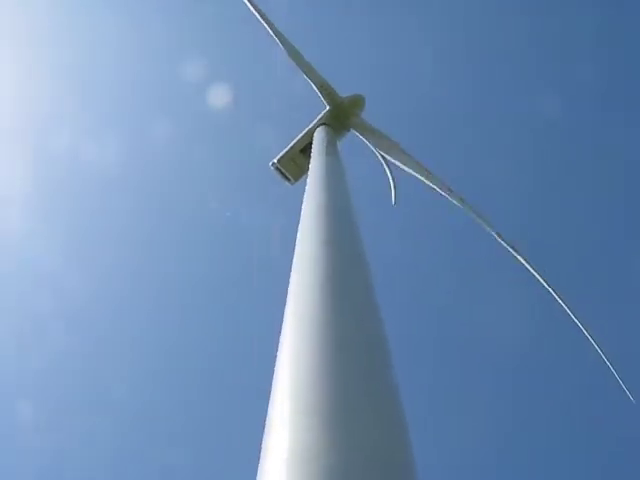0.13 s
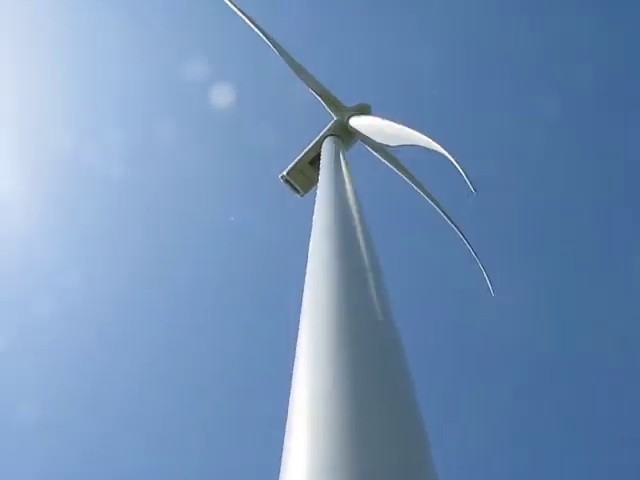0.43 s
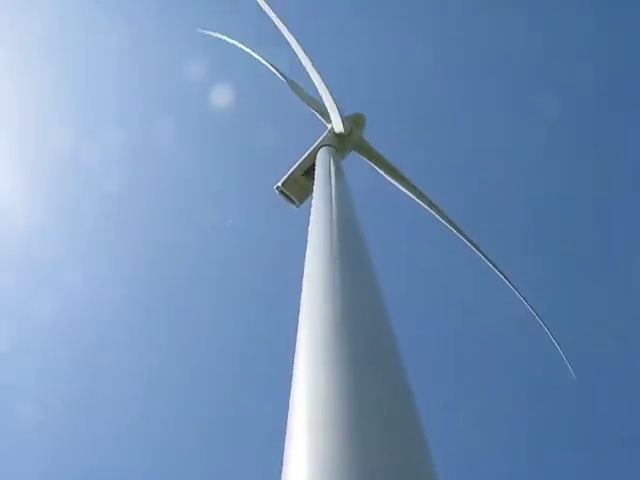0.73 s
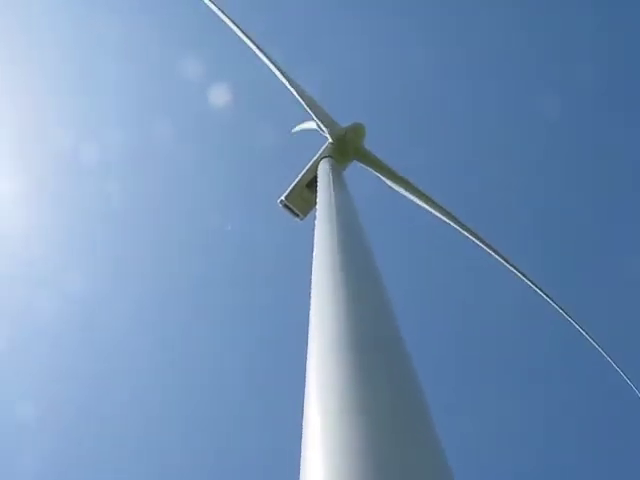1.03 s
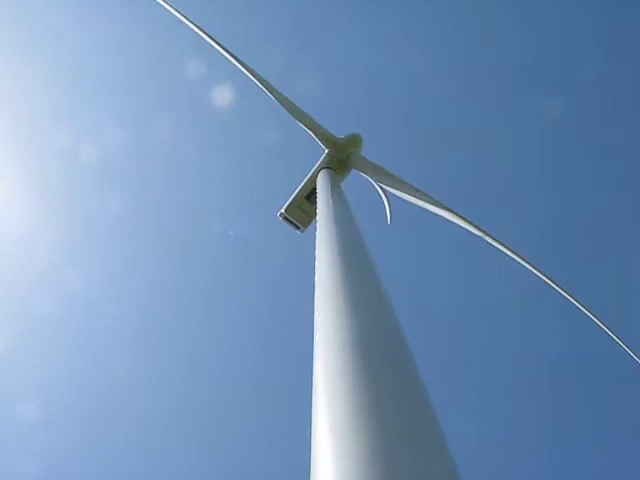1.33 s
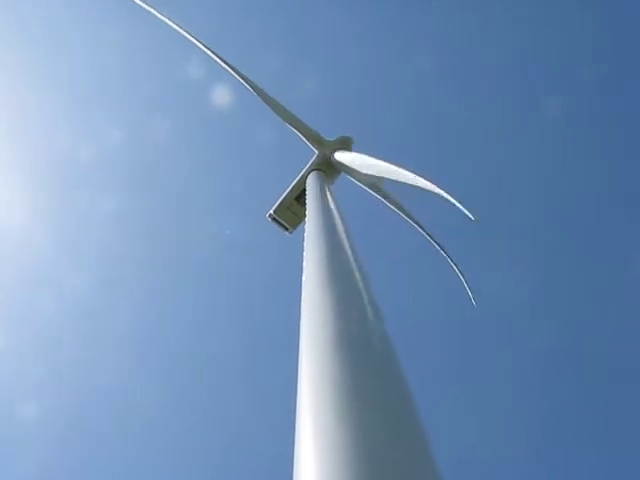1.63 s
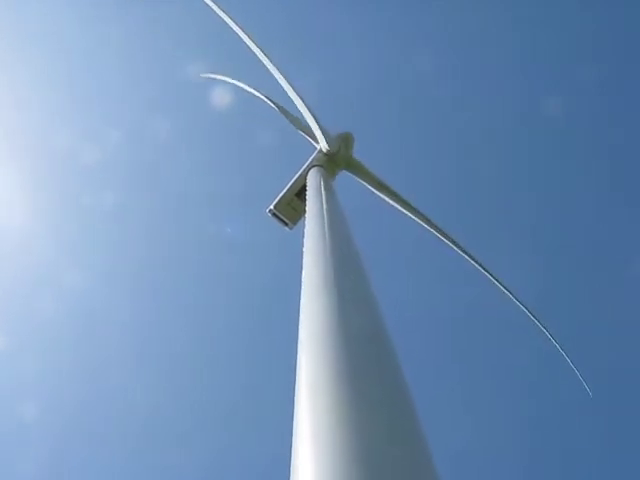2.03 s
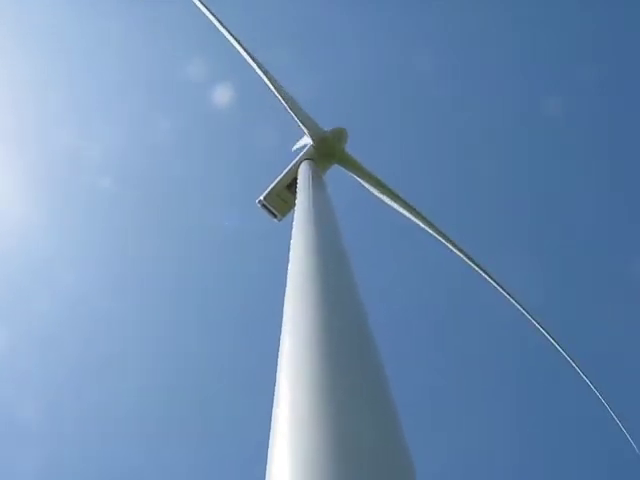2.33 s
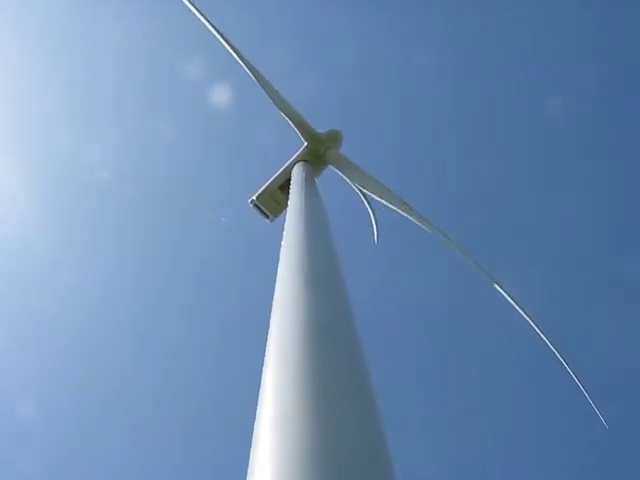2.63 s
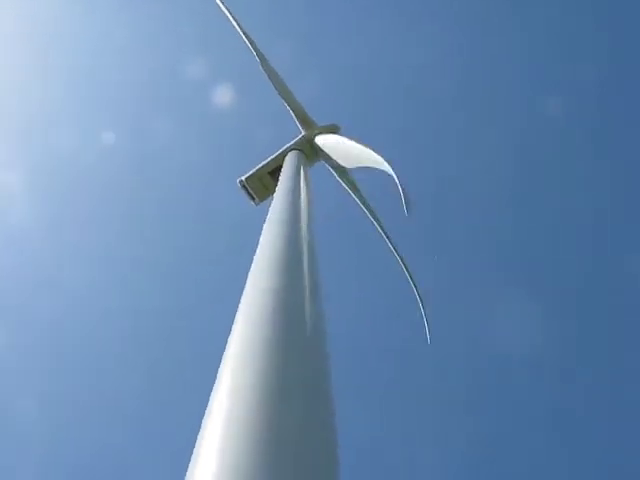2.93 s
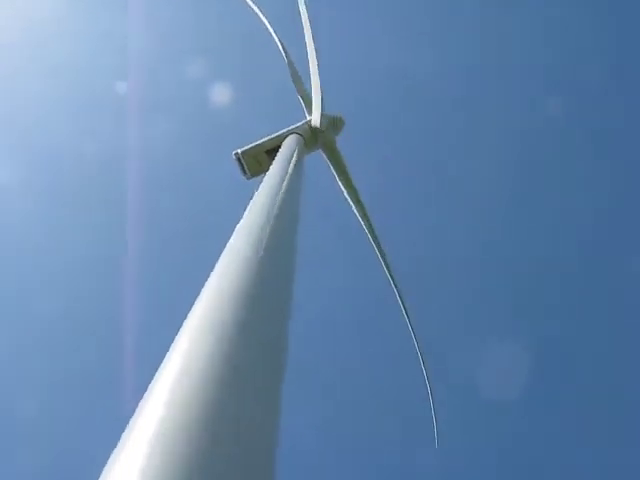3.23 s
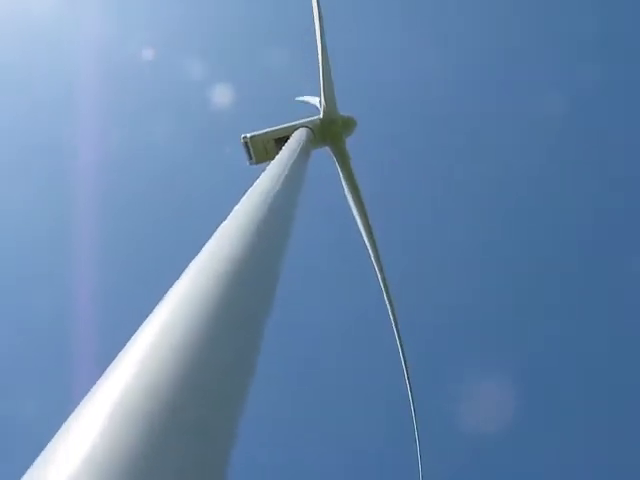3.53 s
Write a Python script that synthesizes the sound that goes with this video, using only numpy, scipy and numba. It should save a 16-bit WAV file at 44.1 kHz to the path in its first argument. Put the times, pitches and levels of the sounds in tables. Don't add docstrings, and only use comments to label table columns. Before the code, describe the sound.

Wind buffeting dominates, low and fluttering, heavier in the right channel; behind it, soft airy blade swooshes swell and fade regularly from a tall wind turbine, heard from its foot in an open outdoor place.

```python
import sys
import numpy as np
from scipy import signal
from scipy.io import wavfile
from scipy.ndimage import uniform_filter1d, map_coordinates
from numba import njit

SR = 44100
rng = np.random.default_rng(int(sys.argv[2]) if len(sys.argv) > 2 else 0)


def gain_from_decibels(decibels):
    exponent = np.asarray(decibels, float) / 20
    return 10 ** exponent


def generate_wav(signal):
    frames = np.transpose(np.atleast_2d(signal))
    scaled = np.clip(frames, -1, 1) * 32767
    pcm = np.round(scaled).astype(np.int16)
    wavfile.write(sys.argv[1], SR, pcm)


N = 162729


@njit
def swept_bandpass(x, hz_share, damping):
    y, band_state, low_state = np.empty(len(x)), 0., 0.
    for i in range(len(x)):
        g = np.tan(np.pi * hz_share[i])
        v = (band_state + g * (x[i] - low_state)) / (1 + g * (g + damping))
        band_state = 2 * v - band_state
        low_state = low_state + 2 * g * v
        y[i] = damping * v
    return y


def noise_band(hz, damping):
    centre = np.clip(hz * np.ones(N) / SR, 0, 4 / 9)
    once = swept_bandpass(rng.standard_normal(N), centre, damping)
    return swept_bandpass(once, centre, damping)


def at(spectrum, hz):
    table = np.array(spectrum)
    return np.interp(np.log(hz), np.log(table[:, 0]), table[:, 1])


def unit(x):
    return x / np.sqrt(np.mean(x ** 2))


def walk(rate_hz):
    lowpass = signal.butter(2, rate_hz, fs=SR, output="sos")
    return unit(signal.sosfilt(lowpass, rng.standard_normal(N)))


def pulse(turns, cycles):
    return np.exp(-(turns / np.where(turns < 0, cycles, 2 * cycles)) ** 2)


# time in seconds, strength in dB, crest in dB,
# second swell in dB, fade time in seconds.
PASSES = [
    (-.58, 12, -3, -8, 0.28),
    (.64, 5.5, -2, -16, 0.31),
    (1.865, 4.5, 0, -19, 0.39),
    (3.07, 7.5, -3, -10, 0.44),
    (4.29, 15.5, -3, -8, .4),
]


def passes(t):
    power, place = gain_from_decibels(2 * FAR_DB), 0
    approach_s, cusp_s = 0.3, 0.025
    for s, db, crest_db, after_db, fade_s in PASSES:
        d = t - s
        body = np.exp(-2 * np.abs(d) / np.where(d < 0, approach_s, fade_s))
        body += gain_from_decibels(2 * crest_db) * np.exp(-(d / cusp_s) ** 2)
        body += gain_from_decibels(2 * -9.5) * np.exp(-((d + 0.16) / 0.058) ** 2)
        body += gain_from_decibels(2 * after_db) * np.exp(-((d - 0.22) / 0.041) ** 2)
        p = gain_from_decibels(2 * db) * body
        power = power + p
        place = place + p * np.tanh(d / 0.35)
    return 10 * np.log10(power), place / power


FAR_DB = -41
# frequency in Hz, level in dB per Hz.
SWISH = [(300, 7), (1000, -3), (2200, -3.5), (3300, -2.5), (4200, -1.5), (7000, -10.5), (10000, -20.5),
         (15500, -26.5)]
# frequency in Hz, share of the swell in dB per dB.
DEPTH = [(500, 0.53), (2000, 0.16), (4500, 1.05), (8000, 1.4), (15000, 1.7)]


def blades(t):
    swell_db, bearing = passes(t)
    alike_near, alike_far = 0.9, 0.47
    alike = np.clip(alike_near + (alike_far - alike_near) * swell_db / FAR_DB, 0, 1)
    hiss, eddy = 0, walk(50)
    for hz in 300 * 2 ** (np.arange(18) / 3):
        db = at(SWISH, hz) + at(DEPTH, hz) * (swell_db + 0.67 * eddy) + 0.88 * walk(4.5)
        hiss = hiss + gain_from_decibels(db) * np.array([noise_band(hz, 0.73) for _ in range(3)])
    hiss = unit(hiss) * gain_from_decibels(-41)
    shared, apart = hiss[0], hiss[1:]
    lag = 0.7 - 1.9 * bearing
    late = map_coordinates(shared, [np.arange(N) - lag], order=5, mode="mirror")
    treble = signal.lfilter(*signal.butter(2, 9100, "high", fs=SR), apart)
    return np.sqrt(alike) * np.array([late, shared]) + np.sqrt(1 - alike) * apart + 0.096 * treble


def recorder_hiss():
    return gain_from_decibels(-90) * np.array([unit(noise_band(11500, 1.6)) for _ in range(2)])


def port(colour, level_db, octaves, flicker_db):
    out = 0
    for hz in 28 * 2 ** (np.arange(16) / 2):
        db = at(colour, hz) + flicker_db * walk(16.3)
        out = out + gain_from_decibels(db) * noise_band(hz * 2 ** octaves, 0.55)
    return unit(out) * gain_from_decibels(level_db)


# time in seconds, level in dB, left minus right in dB, air speed in octaves, of which only the
GUST = [(0.0, -22, -7.5, 0.16), (0.14, -22.5, -8, 0.43), (0.25, -19, -12, 0.29), (0.46, -23, -7, 0.4),
        (0.76, -19, -12, 0.44), (0.97, -22, -10, 0.38), (1.04, -19.5, -10.5, 0.41),
        (1.73, -24.5, -13.5, 0.37), (2.21, -21.5, -12, 0.3), (2.28, -23.5, -14, 0.2),
        (2.48, -25, -11, 0.17), (2.75, -24, -10, 0.35), (2.84, -21.5, -14, 0.28), (2.95, -24, -8.5, 0.34),
        (3.13, -21, -8, 0.24), (3.52, -22.5, -5, 0.32), (3.63, -18.5, -9, 0.1), (3.69, -24.5, -4, 0.36)]
# frequency in Hz, level in dB per Hz.
RIGHT = [(25, -44), (60, -13), (150, 0), (300, 1), (500, -2), (900, -16), (1800, -29), (4000, -55)]
# frequency in Hz, level in dB per Hz.
LEFT = [(25, -27), (60, -14), (130, -8.5), (200, -7.5), (400, -23.5), (800, -30), (1600, -44), (3000, -61)]


def wind(t):
    when, db, lean_db, speed = np.array(GUST).T
    gust = np.interp(t, when, db)
    lean = np.interp(t, when, lean_db)
    swell = np.interp(t, when, speed)
    surge_db = surges(t)
    flutter = 0.04 * walk(18.6) + 0.085 * walk(47.0) + 0.14 * walk(214)
    octaves = swell - swell.mean() + puff_speed(t) + 0.0427 * surge_db + flutter
    right = port(RIGHT, 6.5 + gust + 0.44 * surge_db + 0.4 * walk(17.0), octaves, 0.39)
    left_octaves = 0.088 * walk(14.3) + 0.17 * walk(91)
    left = port(LEFT, 6 + gust + lean + 0.5 * walk(7.2), left_octaves, 1.75)
    return np.array([left, right])


SURGE_RISE_S = 0.00287
# time in seconds, peak in dB, pitch in Hz.
BUFFETS = [(0.16, -16, 643), (0.306, -22, 397), (0.368, -18.5, 420), (0.405, -12.5, 516),
           (0.681, -18.5, 600), (0.856, -19.5, 439), (0.932, -19, 534), (1.052, -14, 610),
           (1.162, -18.5, 401), (1.212, -18.5, 506), (1.289, -13, 403), (1.349, -17.5, 570),
           (1.403, -17.5, 396), (1.592, -21, 519), (1.794, -10.5, 460), (1.929, -16, 563),
           (2.166, -14, 635), (2.258, -15, 589), (2.37, -13, 513), (2.401, -15.5, 437), (2.774, -16.5, 396),
           (2.938, -20.5, 428), (2.997, -21.5, 606), (3.111, -12, 574), (3.191, -18, 530), (3.25, -17, 444),
           (3.341, -20, 436), (3.486, -16, 406), (3.552, -14.5, 554), (3.673, -15, 490)]


def thuds(t):
    out, cycles = np.zeros(N), 0.95
    for s, db, hz in BUFFETS:
        turns = (t - s - SURGE_RISE_S) * hz - cycles
        out += gain_from_decibels(db + 2) * pulse(turns, cycles) * np.sin(2 * np.pi * turns)
    return out


def surges(t):
    surge_db, fade_s = np.zeros(N), 0.027
    for s, db, _ in BUFFETS:
        d = t - s - SURGE_RISE_S
        surge_db += max(db + 20, 0) * np.exp(-np.abs(d) / np.where(d < 0, SURGE_RISE_S, fade_s))
    return surge_db - surge_db.mean()


# time in seconds, peak in dB, pitch in Hz.
LUMPS = [(0.214, -16, 208), (0.314, -18, 187), (0.726, -14, 283), (1.049, -10, 194), (1.404, -12, 369),
         (1.817, -12, 234), (2.12, -13, 186), (2.255, -12, 238), (2.296, -9, 280), (2.839, -10.5, 287),
         (3.098, -13, 180), (3.177, -14, 310), (3.305, -12, 318), (3.546, -8.5, 186), (3.6, -11, 139)]


def lumps(t):
    out, cycles = np.zeros(N), 1.23
    for s, db, hz in LUMPS:
        turns = (t - s) * hz - cycles
        out += gain_from_decibels(db + 3) * np.exp(-(turns / cycles) ** 2) * np.sin(2 * np.pi * turns)
    return out


# time in seconds, peak in dB, pitch in Hz.
PUFFS = [(0.2754, -33, 3140), (0.3714, -28.5, 3120), (0.408, -29, 2600), (0.703, -17, 2580),
         (0.8958, -23, 2170), (0.995, -23, 2200), (1.0347, -23, 2800), (1.104, -24, 3300),
         (1.1303, -30, 3800), (1.295, -30, 3000), (1.332, -26, 3200), (1.423, -32, 3676),
         (1.4443, -42, 2600), (1.471, -34.5, 2600), (1.509, -29.5, 2600), (1.5535, -17, 2170),
         (1.594, -27, 1900), (1.7316, -24, 2300), (1.768, -21.5, 2800), (1.799, -23.5, 2000),
         (1.9657, -19, 1500), (2.0876, -37, 3700), (2.182, -31, 2000), (2.1934, -26.5, 2100),
         (2.2494, -47, 3676), (2.27, -27.6, 2600), (2.275, -42, 2186), (2.2924, -17, 1600),
         (2.3082, -16, 2280), (2.334, -30, 2200), (2.4, -32, 2600), (2.7623, -24, 2186),
         (2.78, -16.5, 1890), (3.123, -18, 1410), (3.1264, -6.5, 3080), (3.1439, -19, 1545),
         (3.599, -16, 1838), (3.6227, -18.5, 1838)]


def ticks(t):
    out, sag = np.zeros(N), 0.4
    for s, db, hz in PUFFS:
        near = slice(int((s - .01) * SR), int((s + .02) * SR))
        turns = (t[near] - s) * hz
        falling = turns * (1 - sag * np.tanh(turns / 4))
        out[near] += gain_from_decibels(db - 1.5) * pulse(turns, 1.6) * np.sin(2 * np.pi * falling)
    return out


def puff_speed(t):
    octaves = np.zeros(N)
    for s, db, _ in PUFFS:
        octaves += 0.02 * max(db + 32.5, 0) * np.exp(-np.abs(t - s) / .005)
    return np.minimum(octaves, .4)


def rasp(t):
    swell = np.zeros(N)
    for s, db, _ in PUFFS:
        swell += gain_from_decibels(min(db, -27)) * np.exp(-np.abs(t - s) / 0.025)
    grain = unit(noise_band(2200 * 2 ** (.12 * walk(27)), 0.72))
    return gain_from_decibels(-14.5 + 2.7 * walk(150)) * swell * grain


# time in seconds, left level in dB, right level in dB.
SKIPS = [
    (1.4234, -24, -20),
    (2.8798, -34, -27),
]


def skips(t):
    out = np.zeros((2, N))
    for s, left_db, right_db in SKIPS:
        step = (t > s) * np.exp(-np.abs(t - s) / 0.0005)
        out += np.outer(gain_from_decibels([left_db, right_db]), step)
    return out


def scene():
    t = np.arange(N) / SR
    right_eddies = thuds(t) + lumps(t) + ticks(t) + rasp(t)
    return blades(t) + recorder_hiss() + wind(t) + np.outer([0, 1], right_eddies) + skips(t)


def band_limit(x):
    return signal.sosfilt(signal.butter(12, 15780, fs=SR, output="sos"), x)


def record(dry):
    span = int(0.016 * SR)
    power = (dry ** 2).max(axis=0)
    smooth = uniform_filter1d(uniform_filter1d(power, span), span)
    loud_db = 10 * np.log10(smooth + 1e-9)
    duck_db = -0.26 * np.maximum(loud_db + 13.5, 0)
    mix = np.tanh(0.78 * dry * gain_from_decibels(duck_db)) / 0.82
    return band_limit(mix)


dry = scene()
out = record(dry)
generate_wav(out)
```